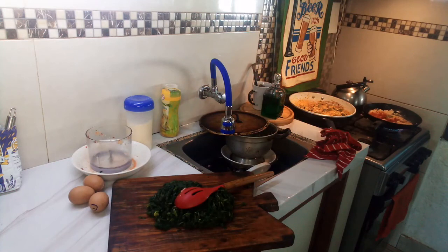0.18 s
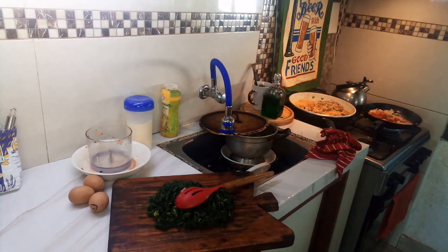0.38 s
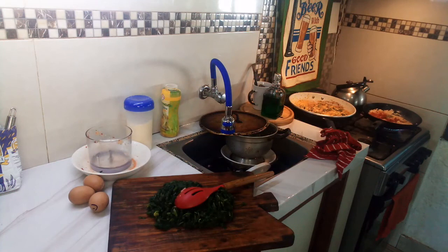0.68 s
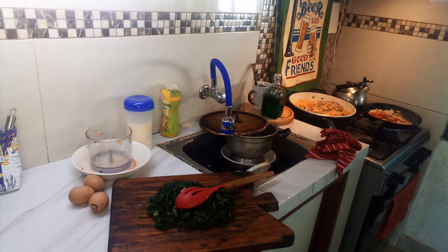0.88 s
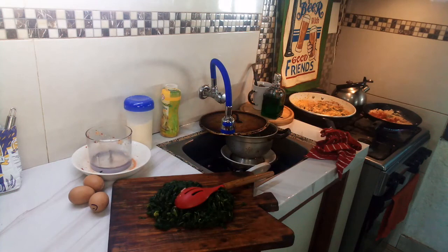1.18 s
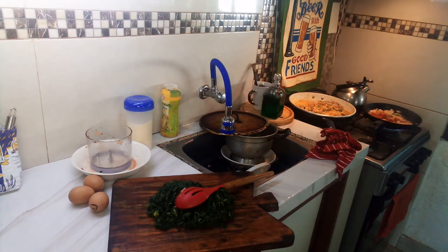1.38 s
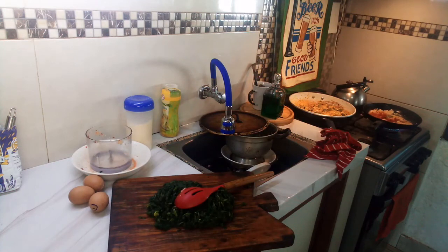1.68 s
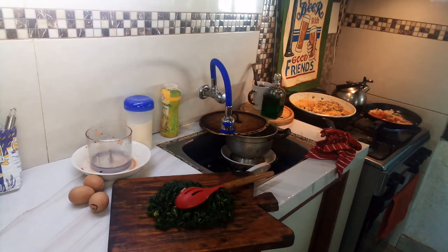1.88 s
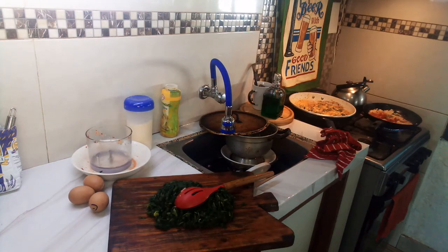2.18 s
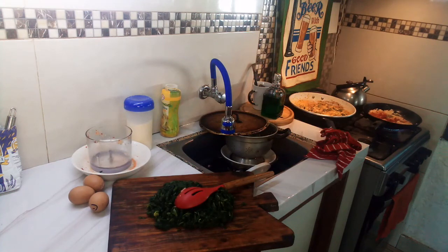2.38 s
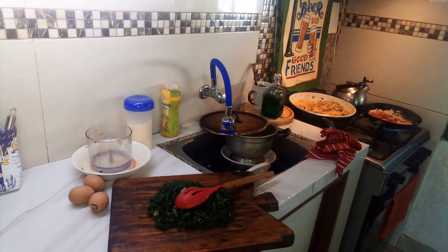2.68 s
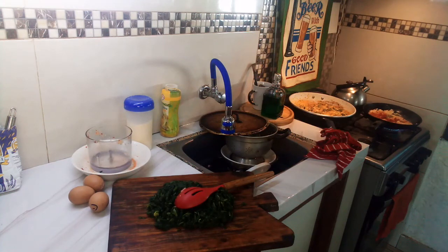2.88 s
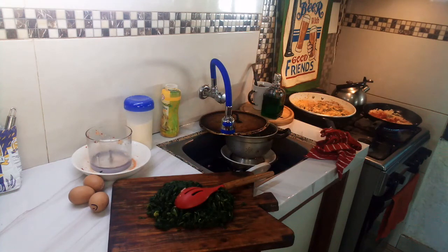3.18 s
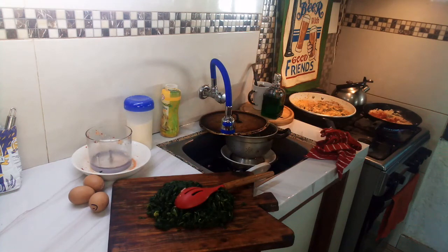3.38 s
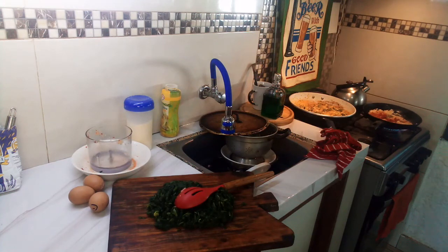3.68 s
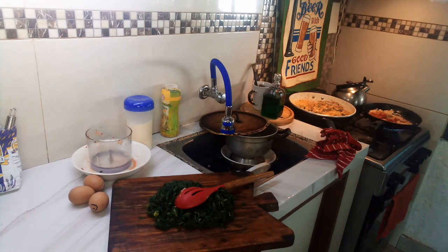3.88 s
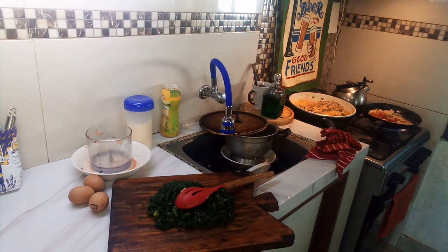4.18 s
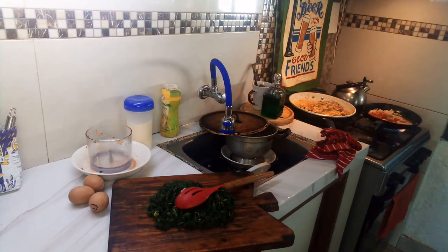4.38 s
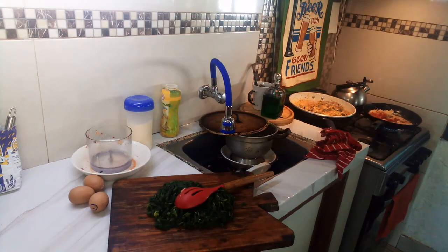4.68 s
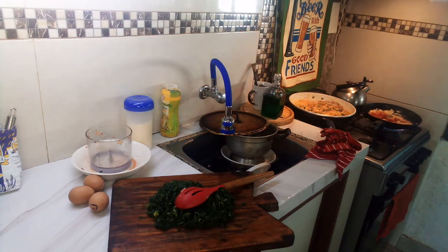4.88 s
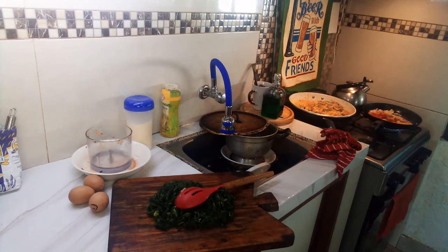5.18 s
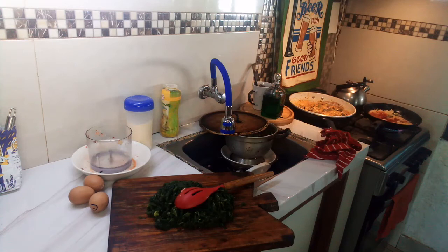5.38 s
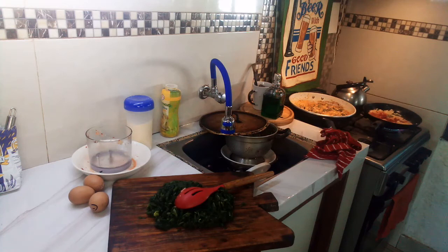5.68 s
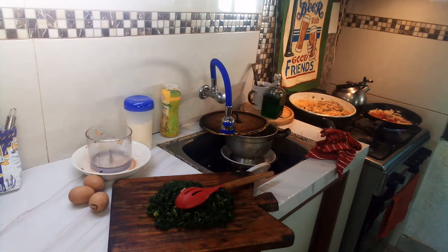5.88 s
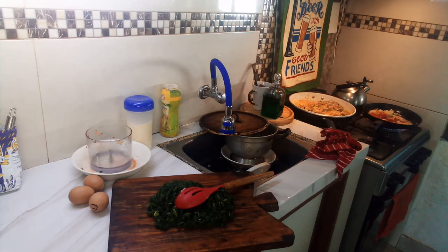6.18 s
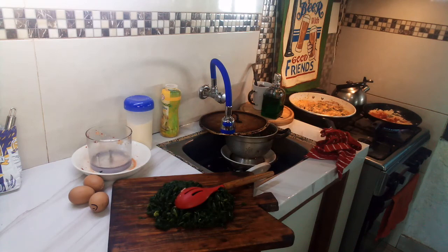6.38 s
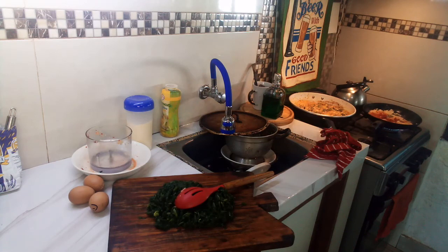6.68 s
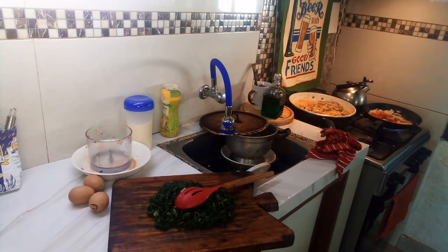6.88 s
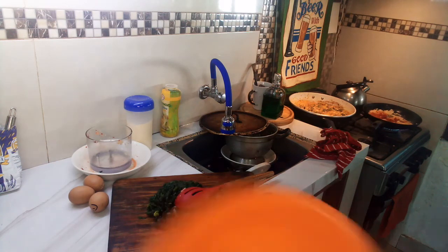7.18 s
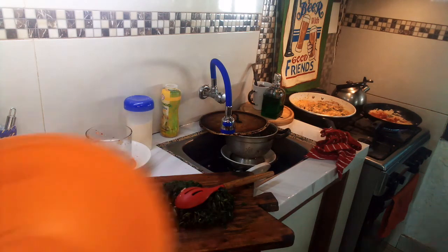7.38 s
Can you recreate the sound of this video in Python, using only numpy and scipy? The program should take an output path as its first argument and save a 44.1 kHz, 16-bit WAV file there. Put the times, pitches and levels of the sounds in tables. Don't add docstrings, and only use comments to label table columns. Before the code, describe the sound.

Faint frying and a low fridge hum sit under a rattling drawer, a loud door slam that shakes crockery, scattered wooden bumps and a bowl scuff.

```python
import sys
import numpy as np
from scipy import signal
from scipy.fft import rfft, irfft, next_fast_len
from scipy.io import wavfile
from scipy.ndimage import uniform_filter1d, map_coordinates

SR = 44100
rng = np.random.default_rng(int(sys.argv[2]) if len(sys.argv) > 2 else 0)


def voltage_ratio(level):
    return 10 ** (np.asarray(level, float) / 20)


def int16_out(signal):
    q = np.round(np.clip(np.atleast_2d(signal).T, -1, 1) * 32767)
    wavfile.write(sys.argv[1], SR, q.astype(np.int16))


N = 332955


def unit(x):
    return x / np.sqrt(np.mean(x ** 2) + 1e-20)


def along(points, hz):
    f, v = np.transpose(points)
    return np.interp(np.log(hz + 1), np.log(f + 1), v)


def curves(rows):
    s, *columns = np.transpose(rows)
    return [np.interp(np.arange(N) / SR, s, c, -150, -150) for c in columns]


def spans(tables):
    return np.max([curves(rows) for rows in tables], axis=0)


def swells(rows):
    shapes = [[(s - rise, db - 20), (s, db), (s + fall, db - 20)] for s, db, rise, fall in rows]
    return voltage_ratio(spans(shapes)[0])


def wobble(rate):
    knots = rng.standard_normal(int(N * rate / SR) + 4)
    return map_coordinates(knots, [np.arange(N) * rate / SR])


def filtered(x, response):
    m = next_fast_len(len(x) + 8192)
    return irfft(rfft(x, m) * response(np.fft.rfftfreq(m, 1 / SR)), m)[:len(x)]


def resonances(modes):
    def response(f):
        return sum((-1) ** k * voltage_ratio(db) * 1j * f * width / (hz * hz - f * f + 1j * f * width)
                   for k, (hz, width, db) in enumerate(modes))
    return response


def rush(spectrum, patchy_db, grit_db=0):
    grains = rng.standard_normal(N) * voltage_ratio(grit_db * wobble(900))
    z = signal.stft(grains, nperseg=1024)[2]
    field = uniform_filter1d(rng.standard_normal(z.shape), size=5, axis=0)
    field = uniform_filter1d(field, size=6, axis=1)
    patches = signal.istft(z * voltage_ratio(patchy_db * unit(field)), nperseg=1024)[1][:N]
    return unit(filtered(patches, lambda hz: voltage_ratio(along(spectrum, hz))))


def ring(modes, rise, sag=0, waver_db=0):
    longest = min(max(t60 for _, _, t60 in modes), .7)
    t = np.arange(round(SR * longest)) / SR
    bent = t + sag * 0.041 * (1 - np.exp(-t / 0.035))
    luck = rng.uniform(size=(len(modes), 2))
    knots = rng.standard_normal((len(modes), 32))
    tones = np.zeros(len(t))
    for (hz, db, t60), (strength, phase), row in zip(modes, luck, knots):
        waver = waver_db * np.interp(t * 40, np.arange(len(row)), row)
        level = voltage_ratio(db + 2.4 * strength + waver - 60 * t / min(t60, .9))
        tones += level * np.sin(2 * np.pi * (hz * bent + phase) + waver / 6)
    return tones * (1 - np.exp(-t / rise))


def add(track, s, sound):
    part = track[round(s * SR):][:len(sound)]
    part += sound[:len(part)]


# (frequency [Hz], t60 [s])
ROOM_RING = [(100, 0.81), (400, 0.49), (2000, 0.55), (6000, 0.32), (12000, 0.13)]


def echoes(colour_db, rise, share):
    hz, t, z = signal.stft(rng.standard_normal(SR * 3 // 5), SR, nperseg=256)
    t60 = (share * along(ROOM_RING, hz))[:, None]
    tail = signal.istft(z * voltage_ratio(-60 * t / t60), SR, nperseg=256)[1]
    s = np.arange(len(tail)) / SR
    early = np.exp(-s / 0.087)
    tail = tail * voltage_ratio(5 * early * rng.standard_normal(len(tail)))
    tail = filtered(tail, lambda f: voltage_ratio(colour_db(f)))
    tail = tail * (1 - np.exp(-s / max(rise, 1e-4)))
    return tail / np.sqrt(np.mean(tail[:SR // 25] ** 2))


# (time [s], strength [dB])
HEAT = [(0.0, -53.5), (0.67, -55.5), (1.14, -55.5), (1.37, -53.5), (2.19, -55.5), (2.54, -57), (2.75, -55),
        (2.88, -51.5), (3.09, -55.5), (3.7, -55), (4.08, -56.5), (5.51, -55), (6.12, -56.5), (6.92, -52),
        (7.25, -56), (7.55, -55)]
# (frequency [Hz], level [dB per Hz])
MURMUR_COLOUR = [(470, -41), (800, -19), (886, -9), (1070, -9), (1390, 0), (1620, -3), (1780, -7.5),
                 (2300, -7.5), (2990, -32.5), (5060, -120)]
SIZZLE_COLOUR = [(1000, -32.5), (1700, -9), (1770, -17), (2530, -1), (2970, -2), (3230, 0), (4840, -1.5),
                 (5450, 0), (6310, 1), (9000, -35), (11700, -55.5), (19800, -120)]
RUMBLE_COLOUR = [(15, -40), (25, 0), (96, -1), (144, -3.5), (207, -1.5), (383, -7), (472, -4), (786, -11),
                 (900, -9.5), (1170, -43), (1980, -120)]
HISS_COLOUR = [(4120, -31), (7000, 0), (7190, -2.5), (8070, -16.5), (8730, -14.5), (9570, -20),
               (11600, -21), (13600, -24), (15100, -7), (15800, -12)]
SLEEVE_COLOUR = [(2940, -22), (5000, 6.5), (6390, 8.5), (7600, -5), (10800, -16.5), (13700, -18),
                 (14600, -1), (15800, -21)]
# (peak time [s], level [dB], rise [s], fall [s])
SLEEVE_SWISHES = [(.84, -62, 0.019, 0.16), (1.714, -70, 0.027, 0.066), (1.84, -66, .05, .1),
                  (3.942, -87, 0.06, 0.032), (4.48, -60.5, .03, 0.043), (4.76, -62, 0.025, .15),
                  (5.29, -55, 0.045, 0.17), (5.338, -54, 0.11, 0.11), (6.3, -65, .055, 0.14),
                  (6.926, -58, 0.063, .065), (7.25, -59, .015, 0.033)]
# (time [s], level [dB])
HUM_SWELLS = [(.22, -69), (.68, -60.5), (.94, -68), (2.284, -73), (2.6, -82), (3.119, -76), (3.86, -69),
              (4.27, -67), (4.63, -69), (4.85, -71), (5.94, -85), (6.349, -67.5), (7.108, -59.5),
              (7.42, -77)]


def room_tone():
    heat_db, = curves(HEAT)
    mean_db = np.mean(np.transpose(HEAT)[1])
    hotter_db = heat_db - mean_db
    murmur_db = mean_db - 7.5 + 1.6 * hotter_db + 1.8 * wobble(4.1)
    murmur = voltage_ratio(murmur_db) * rush(MURMUR_COLOUR, patchy_db=1.86)
    rumble = voltage_ratio(-69 + 0.88 * wobble(6.2)) * rush(RUMBLE_COLOUR, patchy_db=3)
    sizzle_db = mean_db - 3 + 0.79 * hotter_db + 0.31 * wobble(11.0)
    sizzle = voltage_ratio(sizzle_db) * rush(SIZZLE_COLOUR, patchy_db=2.03, grit_db=-0.5)
    hiss = voltage_ratio(-71 + .7 * wobble(18)) * rush(HISS_COLOUR, patchy_db=2.0)
    sleeves = swells(SLEEVE_SWISHES) * rush(SLEEVE_COLOUR, patchy_db=1.0, grit_db=0.5)
    load = voltage_ratio(-83) + swells([(s, db, 0.13, 0.18) for s, db in HUM_SWELLS])
    hum_hz = 100 + 3 * wobble(5.2)
    hum = load * voltage_ratio(wobble(22)) * np.sin(2 * np.pi * np.cumsum(hum_hz) / SR)
    return murmur + rumble + sizzle + hiss + sleeves + hum


# (time [s], peak [dB], thud [dB], snap [dB], share of the room's ring time [1])
WOOD_KNOCKS = [(0.512, -46.5, -38, -11.5, 1), (1.14, -41, -1.5, -10, 0.3), (1.44, -44, -10, -16.5, 0.43),
               (1.474, -27.5, -14, -7.5, 0.55), (1.504, -32.5, -11.5, -6, 0.7),
               (1.539, -36, -11.5, -14, 0.67), (1.922, -41, 7.5, -19, 0.69), (5.256, -43, -13, -20, 0.96),
               (5.409, -49.5, -24, -23, .5), (5.74, -39, -17, -14.5, 0.98), (6.393, -45.5, -38, -18, 0.88),
               (6.654, -35.5, -9, -18, 0.3), (6.662, -32, -5, -19, 0.59), (6.684, -36, -9, -23, 0.8),
               (7.137, -41.5, 0, -10, 0.4)]
# (frequency [Hz], level [dB])
WOOD_COLOUR = [(50, -32), (110, -9), (200, -5.5), (450, -1), (900, 4), (1500, 1), (2500, -5), (4000, -9),
               (6500, -8), (8000, -27), (15000, -51)]
# (time [s], peak [dB])
SHARP_CONTACTS = [(1.1405, -38), (1.4805, -27), (2.7256, -11), (2.7325, -12), (2.7384, -8), (2.7475, -11),
                  (5.2576, -37), (5.7415, -33), (7.137, -35), (2.7183, -20), (2.757, -12), (2.7775, -14),
                  (6.957, -40)]
# (frequency [Hz], level [dB], t60 [s])
STOP_MODES = [(397.5, -6.5, 0.22), (920, -17, 0.29), (1150, 4, 0.11), (1290, -11, 0.091), (558, -7, 0.13),
              (2848, -12.5, .15), (770, -8.5, 0.17), (2050, -14, 0.12), (1502, -7.5, 0.15),
              (1586, -5, 0.12), (1830, -20, 0.33), (3640, -17, 0.15)]
# (time [s], level [dB])
STOP_HITS = [
    (1.478, -33),
    (1.508, -35),
    (1.541, -51),
    (1.574, -48),
    (1.6, -47.5),
]
# (time [s], level [dB],
# pitch [Hz], t60 [s])
SOFT_BUMPS = [(0.303, -60, 294, 0.4), (.645, -49, 108, 0.27), (0.648, -56.5, 183, 0.21),
              (1.185, -47, 61, .3), (1.19, -52, 100, 0.46), (1.3, -54, 352, .35), (1.74, -50, 240, .33),
              (1.831, -52, 250, 0.35), (1.925, -45, 240, 0.46), (3.23, -56, 294.3, 0.18),
              (3.265, -53.5, 247, 0.093), (3.409, -57, 183, 0.17), (3.3, -71, 527, 0.15),
              (3.99, -60.5, 425, 0.19), (4.81, -60, 612, 0.26), (5.16, -62, 182, 0.13),
              (5.41, -61, 906, .08), (5.48, -54, 450, 0.12), (5.537, -52, 401, 0.1),
              (6.658, -35, 94.6, 0.32), (6.666, -40, 170, 0.24), (6.67, -41.5, 336.4, 0.26),
              (6.91, -58, 563, 0.13), (6.945, -47.5, 481, .1), (5.3, -53.5, 60, 0.33),
              (5.256, -49.5, 957, 0.31), (5.256, -50.5, 1150, 0.088), (5.265, -51.5, 371, 0.17),
              (5.335, -55, 1284, 0.27), (5.404, -57, 431, 0.27), (5.589, -62, 461, 0.24),
              (5.75, -50.5, 401, 0.2), (5.745, -55, 677, 0.22), (5.8, -57.5, 169, .2),
              (1.452, -46, 319, .12), (1.922, -42, 351.5, 0.24), (7.075, -58, 271, 0.27),
              (5.74, -47, 1700, 0.069), (2.17, -60, 1007, 0.17), (7.476, -51, 1680, .2),
              (7.484, -52, 1900, .12), (1.96, -48, 210, .3), (2.72, -36, 72, .5), (6.66, -44, 800, .15),
              (6.66, -43, 520, .15), (7.133, -48, 498, 0.067), (7.135, -49, 184, 0.11)]
# (time [s], peak [dB], t60 [s])
NEAR_TICKS = [
    (0.8387, -54, 0.02),
    (1.714, -59, 0.023),
    (4.741, -63, 0.018),
    (6.751, -59.5, 0.024),
    (7.2479, -58.5, 0.016),
]


def knocks():
    out, t = np.zeros(N), np.arange(SR // 8) / SR
    for s, db, thud_db, snap_db, share in WOOD_KNOCKS:
        tilt = [(400, thud_db + 17.5), (850, 0.011), (1300, 0), (3300, snap_db + 12.5)]
        colour = lambda f: along(WOOD_COLOUR, f) + along(tilt, f)
        sound = echoes(colour, rise=0.0024, share=np.clip(share, .2, 1.5))
        add(out, s, voltage_ratio(db - 10.5 + max(thud_db, 0)) * sound)
    for s, db in SHARP_CONTACTS:
        add(out, s, -voltage_ratio(db + 1.0) * np.sin(2 * np.pi * 1500 * t) * np.exp(-t / 0.00044))
    for s, db in STOP_HITS:
        add(out, s, voltage_ratio(db) * ring(STOP_MODES, rise=0.003, waver_db=2.5))
    for s, db, hz, t60 in SOFT_BUMPS:
        pair = [(hz, 0, t60), (hz * 9 / 8, -9, t60)]
        add(out, s, voltage_ratio(db) * ring(pair, rise=3 / hz, sag=.2))
    tick_colour = [(1500, -36), (3000, -5.5), (6500, -0.5), (8500, -19), (13000, -20), (15000, -12.0)]
    for s, db, t60 in NEAR_TICKS:
        click = rng.standard_normal(len(t)) * voltage_ratio(-60 * t / max(t60, .003))
        add(out, s, voltage_ratio(db + 17.5) * filtered(click, lambda f: voltage_ratio(along(tick_colour, f))))
    return out


# (time [s], push [dB])
HAND_PUSHES = [
    [(1.12, -70), (1.14, -45.5), (1.408, -43.5), (1.414, -48), (1.456, -36.5), (1.468, -40.5), (1.482, -41),
     (1.5, -36)],
    [(1.6, -55.5), (1.654, -56), (1.702, -47.5), (1.714, -52), (1.738, -45), (1.916, -46.5), (1.928, -39.5),
     (2.16, -66)],
    [(6.2, -73), (6.26, -75), (6.264, -63), (6.388, -58), (6.394, -64.5), (6.53, -56), (6.54, -62),
     (6.6, -71.5)],
    [(6.86, -73.5), (6.905, -54), (6.938, -51.5), (6.948, -46.5), (7.026, -48.5), (7.058, -56.5),
     (7.12, -61)],
]
# (box [dB], scrape first [dB], scrape last [dB], cavity first [Hz], cavity last [Hz])
STROKE_DRIFTS = [
    (-2, 4, -9.5, 420, 355),
    (0, -8.5, -7, 370, 372),
    (-13.5, 0.5, 0.5, 330, 390),
    (-4.5, 1.5, -1.5, 600, 220),
]


def strokes():
    tables = []
    for push, (box_db, first_db, last_db, first_hz, last_hz) in zip(HAND_PUSHES, STROKE_DRIFTS):
        s, db = np.transpose(push)
        done = (s - s[0]) / (s[-1] - s[0])
        rougher_db = done * (last_db - first_db)
        box = db + box_db - 0.21 * rougher_db
        scrape = db + first_db + rougher_db
        cavity_hz = first_hz + done * (last_hz - first_hz)
        tables.append(np.transpose([s, box, scrape, cavity_hz]))
    return spans(tables)


# (frequency [Hz], width [Hz], level [dB])
BOX_MODES = [(240, 64, -1), (338.2, 65, -2), (408.7, 47, 1.5), (555, 140, -7.5)]
# (frequency [Hz], width [Hz], level [dB])
RAIL_MODES = [(913, 90, -0.5), (1540, 220, -1), (1810, 240, -1.5), (2760, 400, -6)]
# (peak time [s], level [dB], rise [s], fall [s])
RAIL_RUBS = [
    (1.19, -53, .1, .4),
    (1.78, -65.5, .12, .3),
    (1.87, -54.5, 0.26, 0.28),
    (1.97, -53.5, 0.12, .15),
    (6.97, -60, 0.18, .15),
]
# (frequency [Hz], level [dB per Hz])
SCRAPE_COLOUR = [(88, -40), (150, -7), (394, -9), (969, -6.5), (1780, -9.5), (3500, -16.5), (5320, -22.5),
                 (6470, -24), (7500, -29), (9750, -63), (16500, -120)]


def drawer():
    box_db, scrape_db, cavity_hz = strokes()
    bumps = rng.standard_normal(N) * voltage_ratio(2.9 * wobble(60))
    box = .85 * unit(filtered(bumps, lambda f: resonances(BOX_MODES)(f) ** 2))
    turn = 2 * np.pi * np.cumsum(np.abs(cavity_hz) * (1 + .06 * wobble(14))) / SR
    cavity = (0.97 + .8 * wobble(45)) * np.sin(turn) + .8 * wobble(45) * np.cos(turn)
    rubbing = rng.standard_normal(N) * voltage_ratio(2.2 * wobble(80))
    rail = unit(filtered(rubbing, lambda f: resonances(RAIL_MODES)(f) ** 2))
    scrape = rush(SCRAPE_COLOUR, patchy_db=-0.65, grit_db=1.5)
    return swells(RAIL_RUBS) * rail + voltage_ratio(box_db - 4.0) * (box + cavity) + voltage_ratio(scrape_db - 3.5) * scrape


# (time [s], level [dB])
DOOR_CONTACTS = [
    (2.703, -26),
    (2.71, -17),
    (2.723, -13),
    (2.739, -26),
    (2.768, -24.5),
]
# (frequency [Hz], level [dB per Hz])
SLAM_SPECTRUM = [(24, -62.5), (40, -26.5), (101, -10), (154, -26), (214, -10.5), (296, -16.5), (420, -5),
                 (553, -13), (765, -12), (982, -17), (1360, -21), (5250, -30.5), (5800, -25.5),
                 (8030, -47.5), (15800, -69)]
# (frequency [Hz], level [dB])
MICROPHONE_TREBLE = [(12500, -2), (15000, 12.5), (15800, 7.5), (15950, -62.5)]
# (frequency [Hz], level [dB], t60 [s])
DOOR_MODES = [(108, -8, 0.69), (217.8, 0.5, 0.46), (272, -11, 0.62), (356, -8.5, 0.54), (416, 1, 0.5),
              (458, -6, 0.2), (570, -7, 0.25), (791, -12.5, 0.48), (905, -7, 0.3), (1137, -19, 0.28),
              (1380, -16.5, 0.29), (1554, -13, 0.26), (735, -10, 0.25), (1926, -23, 0.28)]
# (frequency [Hz], level [dB], t60 [s])
CROCKERY_MODES = [(2010, -7.5, .36), (2299, -1.5, .22), (2720, -12, .3), (2950, -6, 0.31),
                  (3240, -5.5, 0.3), (3400, -4, .25), (3780, -9, .3), (4156, -7, .18), (4570, -12, 0.2),
                  (4860, -3.5, .2), (5600, -6, 0.45), (5943, -10, .25), (6358, -8, .2), (6675, -9, 0.24)]


def slam():
    out = np.zeros(N)
    tilt = [(250, -4), (600, -1.5), (1100, -1.5), (3000, 0.5)]
    colour = lambda f: along(SLAM_SPECTRUM, f) + along(MICROPHONE_TREBLE, f) + along(tilt, f)
    for s, db in DOOR_CONTACTS:
        add(out, s, voltage_ratio(db - 7.5) * echoes(colour, rise=.005, share=0.99))
    landing, blow, spring = (DOOR_CONTACTS[i][0] for i in (1, 2, -1))
    add(out, blow, voltage_ratio(-18.0) * ring(DOOR_MODES[:4], rise=0.022, waver_db=2.0))
    add(out, landing, voltage_ratio(-14.5) * ring(DOOR_MODES[4:], rise=0.013, waver_db=2))
    add(out, landing, voltage_ratio(-34) * ring(CROCKERY_MODES, rise=.012, waver_db=5))
    add(out, spring, voltage_ratio(-27) * ring(DOOR_MODES[4:], rise=.006, waver_db=3))
    return out


# (peak time [s], level [dB], pitch [Hz], fall [s])
PANEL_GROANS = [
    (3.279, -42, 223.4, 0.048),
    (3.32, -43, 200.3, 0.057),
    (7.007, -48, 300.4, 0.086),
    (7.147, -44.5, 303.7, .09),
]


def groans():
    t, drift = np.arange(N) / SR, np.cumsum(0.051 * wobble(40)) / SR
    out = np.zeros(N)
    for s, db, hz, fall in PANEL_GROANS:
        sag = 0.25 * (t - s) ** 2 / 2
        out += swells([(s, db, .033, fall)]) * np.sin(2 * np.pi * hz * (t + drift - sag))
    return out


# (frequency [Hz], width [Hz], level [dB])
BOWL_MODES = [(1920, 87, -1), (2210, 110, -5), (1740, 120, -4), (2770, 150, -10.5), (3200, 97, -18),
              (5680, 160, -11.5)]
# (peak time [s], level [dB], rise [s], fall [s])
BOWL_SCUFFS = [
    (4.412, -60.5, 0.055, 0.11),
    (4.506, -58, 0.083, 0.12),
    (7.488, -46.5, 0.039, .06),
]


def bowl():
    slips = rng.standard_normal(N) * voltage_ratio(2.7 * wobble(700))
    broad = [(875, 300, -4.5), (1990, 900, 2), (3400, 780, -10)]
    body = unit(filtered(slips, resonances(BOWL_MODES))) + unit(filtered(slips, resonances(broad)))
    body = filtered(body, lambda f: 1 / (1 + (f / 6000) ** 6))
    return swells(BOWL_SCUFFS) * body


def scene():
    return (room_tone() + knocks() + drawer() + slam() + groans() + bowl())[None]


def roll_off(x):
    return signal.sosfilt(signal.butter(12, 15920, fs=SR, output="sos"), x)


def record(dry):
    heard = filtered(dry[0], lambda f: (1j * f / (45 + 1j * f)) ** 2)
    return roll_off(heard[None])


dry = scene()
out = record(dry)
int16_out(out)
```